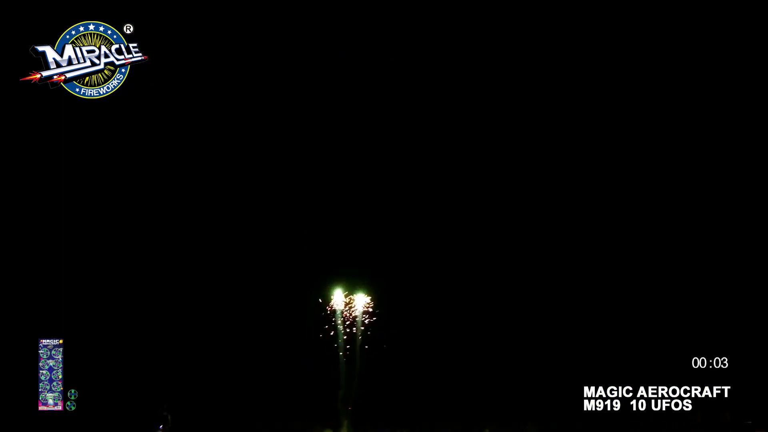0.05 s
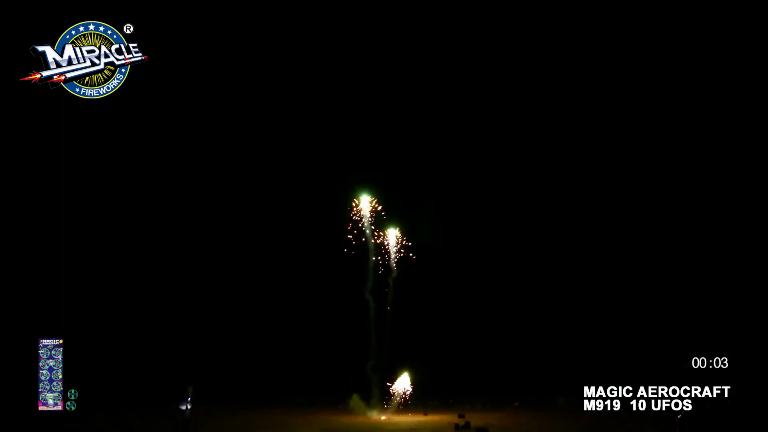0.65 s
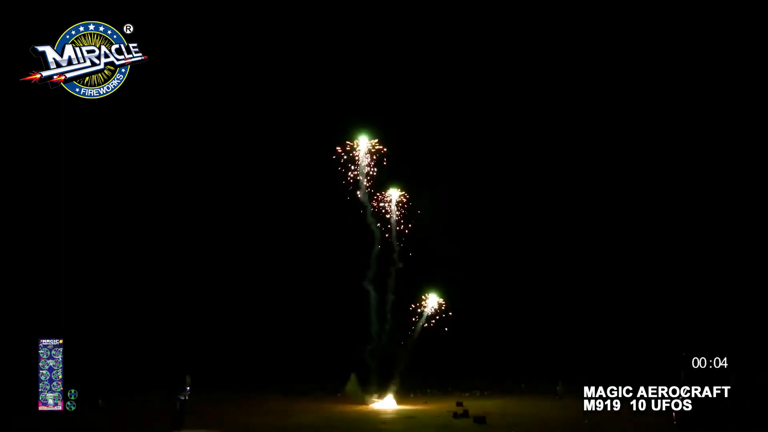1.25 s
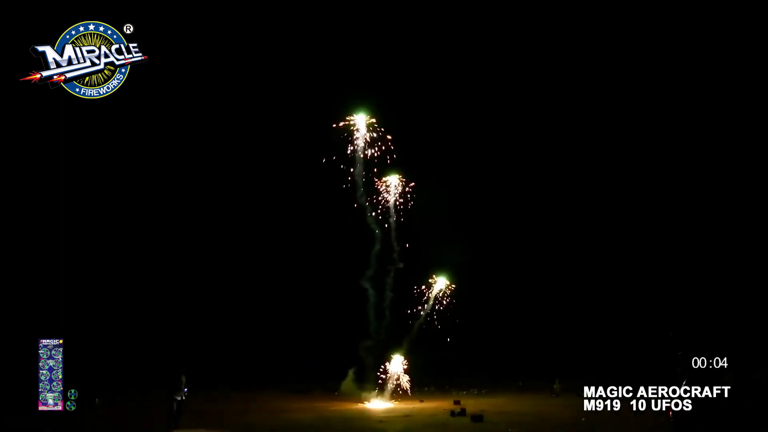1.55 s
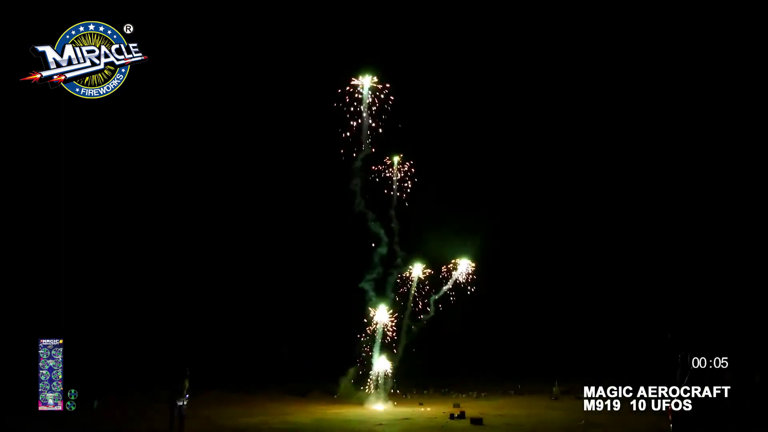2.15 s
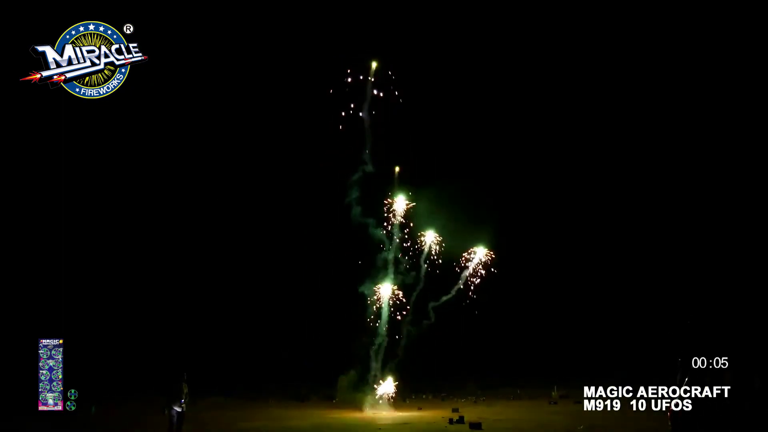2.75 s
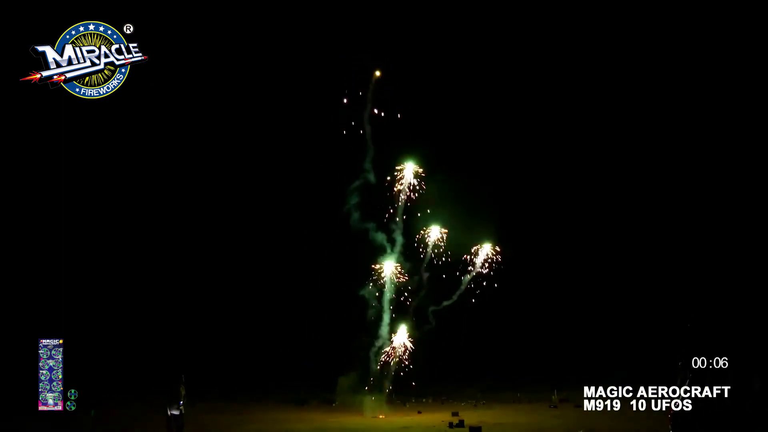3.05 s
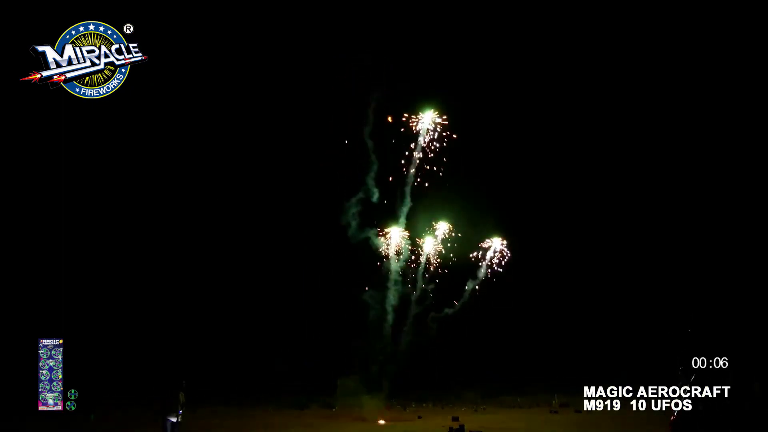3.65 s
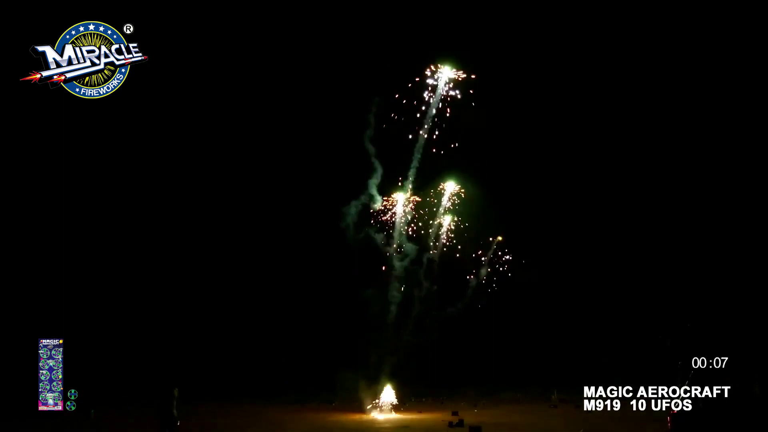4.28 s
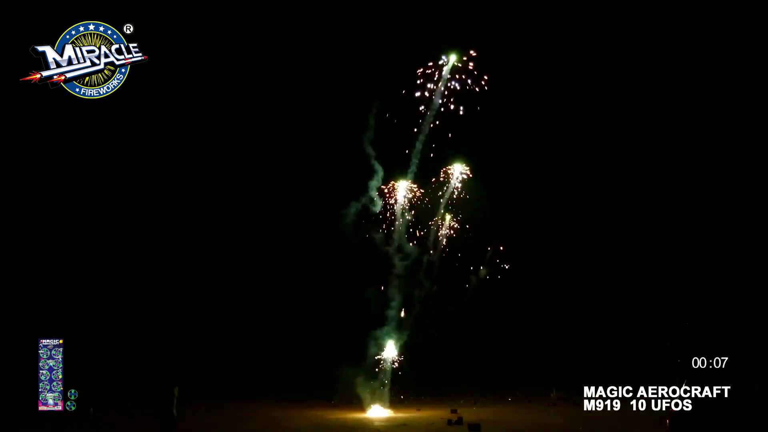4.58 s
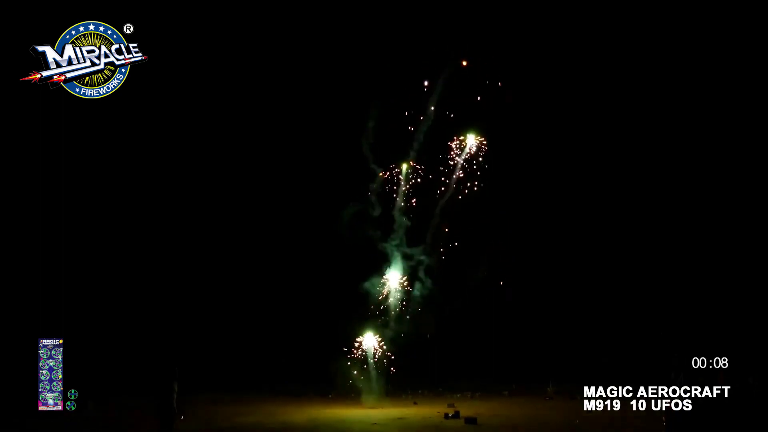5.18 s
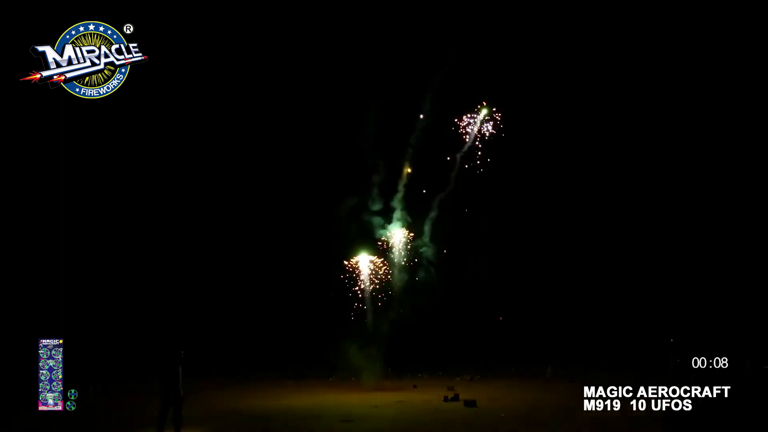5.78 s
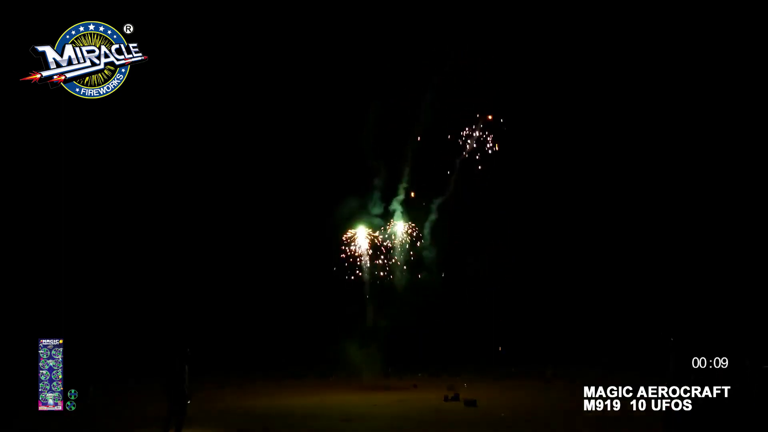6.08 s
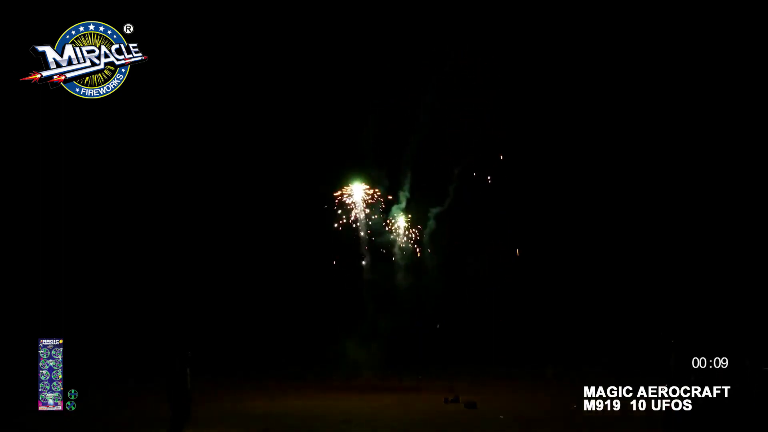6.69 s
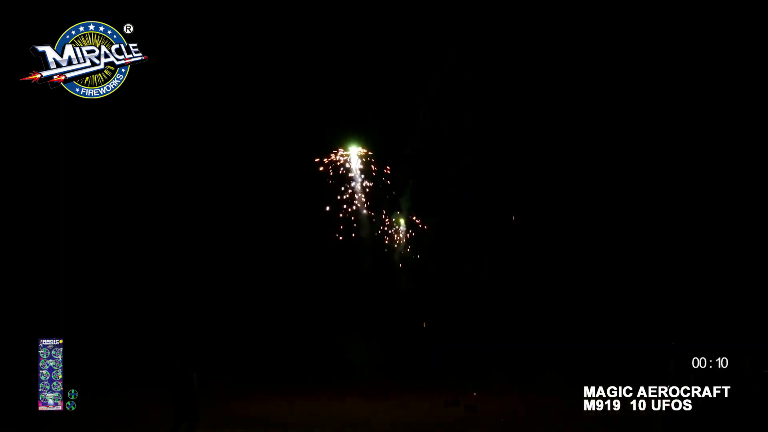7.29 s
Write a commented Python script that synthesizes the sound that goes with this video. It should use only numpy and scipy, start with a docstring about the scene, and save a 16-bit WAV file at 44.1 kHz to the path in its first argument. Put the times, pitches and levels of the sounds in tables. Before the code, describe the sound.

Small spinning fireworks rise one after another with a dense, continuous fizzing hiss, spraying sparks and sputtering outdoors.

```python
"""Spinner fireworks in a night field

Open ground, a stereo microphone facing nine small spinners that light one after another, two of them
already burning. Each gas jet roars low down, then whirls upward at up to about a hundred turns a
second, hissing, sputtering and spraying sparks. Its echo off the ground lags more as it climbs,
so the hiss sweeps downward like a flanger. A faint rumble lies far behind."""
import sys
import numpy as np
from scipy import signal
from scipy.fft import rfft, irfft
from scipy.io import wavfile
from scipy.ndimage import uniform_filter1d, map_coordinates

SR = 44100
rng = np.random.default_rng(int(sys.argv[2]) if len(sys.argv) > 2 else 0)


def transcribe(signal):
    """Save signal, clipped to [-1, 1], as a 16-bit WAV file at the path in sys.argv[1]."""
    frames = np.atleast_2d(signal).T
    limited = np.clip(frames, -1, 1)
    pcm = np.round(limited * 32767).astype(np.int16)
    wavfile.write(sys.argv[1], SR, pcm)


N = 323253
TIME = np.arange(N) / SR
BINS = np.fft.rfftfreq(N, 1 / SR)

# The spinners. Each row: ignition in seconds, burn time in seconds, jet against the others in dB,
# top spin in Hz, roar in dB, roar length in seconds, spark flare and spark trail against the hiss in dB.
SPINNERS = [(-0.88, 3.47, 3.5, 97, -37, 0.5, -5, -4.5), (-1.18, 3.3, 1, 66, -37, 0.5, -2, -6.5),
            (0.25, 4.13, 0.5, 84, -34, 0.55, 1, -6.5), (1.15, 3.67, 2, 80, -31.5, 0.43, 2, -6.5),
            (1.5, 2.7, 3, 96, -32, 0.43, 0.5, -7.5), (1.7, 3.7, 0.5, 114, -37, 0.4, -1, -8),
            (2.5, 3.12, 3, 106, -32.5, 0.43, -0.5, -6), (4, 3.7, 1, 86, -30.5, 0.28, 1.3, -5.5),
            (4.38, 3.8, 5, 99, -33, 0.44, 0.5, -4)]
# Overall loudness of the hiss and sparks, dipping briefly around loud sputters.
# Each row: time in seconds, level in dB.
HISS_LEVEL = [(0.0, -22.5), (0.3, -24), (1.34, -24), (1.38, -24.5), (1.48, -26), (1.61, -23.5),
              (1.63, -25.5), (2.68, -23.5), (2.81, -26), (3.66, -23.5), (4.31, -25), (4.37, -26),
              (4.43, -25.5), (5.37, -23.5), (5.9, -26), (7.3, -25)]


def flights():
    """For each spinner: its share of the jet sound, its angle of turn and its echo lag in samples."""
    # The climbs, as lag of the ground echo. Each row: wait on the ground in seconds, run-up in seconds,
    # lag gained by the leap in ms, later drift in ms per second.
    climbs = [(.19, .4, 2.66, .75), (.2, .47, 2.57, .295), (.31, .45, 2.51, -.07), (.35, .2, 1.2, .71),
              (.27, .48, 4.3, .36), (.19, .41, 1.89, .4), (.24, .39, 3.19, .315), (.26, .52, 3.24, -.24),
              (.3, .36, 1.17, .98)]
    # A spinner's life. Each row: age in seconds, relative jet level in dB, spin as a share of its top.
    life = [(0, -7, .3), (.35, -5.5, .7), (.6, -2, .92), (.88, 1.5, 1), (1.25, -2.5, .94), (1.65, -4, .85),
            (2.25, -2.5, .77), (3.7, -6, .7)]
    shares, angles, lags = [], [], []
    for (lit, burn_s, jet_db, top_hz, *_), climb in zip(SPINNERS, climbs):
        age = TIME - lit
        shares.append(alight(lit, burn_s) * gain_of(jet_db + curve(life, age, column=1)))
        turns = np.cumsum(top_hz * curve(life, age, column=2)) / SR
        angles.append(2 * np.pi * (turns + rng.random()))
        lags.append(echo_lag(age, *climb) * SR)
    together = np.sqrt(np.sum(np.square(shares), 0) + 1e-6)
    return shares / together, angles, lags


def alight(lit, burn_s, catch_s=0.027, die_s=0.31):
    """1 while a spinner burns: it catches at once and gutters out slowly."""
    return np.clip((TIME - lit) / catch_s, 0, 1) * np.clip((lit + burn_s - TIME) / die_s, 0, 1)


def echo_lag(age, wait_s, run_up_s, leap_ms, drift_ms_per_s):
    """A spinner waits, leaps along an S-curve, then drifts; its echo lag in seconds grows with height."""
    flown = np.maximum(age - wait_s, 0)
    leap = 1 - (1 + flown / run_up_s) * np.exp(-flown / run_up_s)
    return leap * (leap_ms + drift_ms_per_s * flown) / 1000


def jets(flight, throb, grainy, ground_echo=0.5, shimmer_samples=0.4):
    """Each nozzle throbs once and twice a turn, reaching the microphone directly and off the ground."""
    total = np.zeros(N)
    shimmer = shimmer_samples * wander(9.7)  # moving air bends the echo's path a little
    for share, angle, lag in zip(*flight):
        gas = rng.standard_normal(N) + grainy * crackle(per_s=1800, spread_db=3)
        jet = share * gas * (1 + throb * (np.cos(angle) + 0.79 * np.cos(2 * angle)))
        on = np.flatnonzero(share)
        echo = map_coordinates(jet, [on - lag[on] - shimmer[on]], order=3)
        # on the ground the two paths add in phase; that extra power is divided out
        in_phase = 1 + 2 * ground_echo / (1 + ground_echo ** 2) * np.exp(-lag[on] / 3)
        total[on] += (jet[on] + ground_echo * echo) / np.sqrt(in_phase)
    return unit_rms(total)


def hiss(flight, flutter, level_db=0.48, throat_db=-1.1, waver_db=0.41, lift_off_db=0.54, split_hz=2800):
    """Gas rushes from all the nozzles; its throaty lower half flutters during the roar of lift-off."""
    # The rushing gas. Each row: frequency in Hz, relative level in dB.
    spectrum = [(60, -41), (250, -17), (500, -12), (800, -10), (1150, -6), (1600, -2), (2050, -1),
                (2400, -1.5), (3600, -1.5), (5100, -2), (5900, -6.5), (6700, -7.5), (9000, -7.5),
                (15500, -27.5)]
    # The course of the throaty half. Each row: time in seconds, level in dB.
    throat_levels = [(0.0, -26), (0.65, -25), (0.75, -28), (0.81, -25.5), (0.91, -28), (1.46, -22.5),
                     (1.48, -26), (2.27, -26.5), (2.82, -23.5), (2.86, -25.5), (4.39, -24.5), (4.47, -27),
                     (4.53, -25), (5.0, -27), (5.1, -25), (5.63, -24.5), (5.71, -26), (7.3, -27.5)]
    rush = rfft(coloured(jets(flight, throb=0.13, grainy=0.27), spectrum))
    low_pass = 1 / (1 + (BINS / split_hz) ** 6)
    flutter_db = lift_off_db * unit_rms(lift_off()) * flutter
    throat_gain = gain_of(throat_db + curve(throat_levels, TIME) + flutter_db)
    throat = unit_rms(irfft(rush * low_pass, N)) * throat_gain
    bright = unit_rms(irfft(rush * (1 - low_pass), N)) * gain_of(curve(HISS_LEVEL, TIME))
    return (throat + bright) * gain_of(level_db + waver_db * wander(12.0))


def sparks(flight, level_db=-0.97, flutter_db=0.76):
    """Burning metal grains add a bright, gritty spray, the more uneven the thicker it is."""
    # The fizz of the grains. Each row: frequency in Hz, relative level in dB.
    spectrum = [(2000, -85), (5000, -7), (7000, -8), (8200, -4), (9600, -2.5), (10400, -5.5), (12000, -7),
                (13500, -10), (15000, -16.5), (16000, -36)]
    # Spurts of sparks. Each row: peak time in seconds, level in dB, length in seconds.
    spurts = [(0.339, -22, 0.039), (0.489, -19, 0.027), (0.523, -21, 0.011), (1.697, -24, 0.025),
              (1.748, -26, 0.02), (1.86, -23, 0.025), (2.133, -20, 0.014), (2.82, -29, 0.02),
              (2.864, -22, 0.012), (4.146, -22.5, 0.024), (4.205, -25, 0.014), (4.261, -19.5, 0.02),
              (4.671, -22, 0.025), (4.71, -22, 0.014), (5.7, -28, 0.04), (6.3, -29, 0.06)]
    spray = unit_rms(coloured(jets(flight, throb=0.24, grainy=0.45), spectrum))
    thickness = spark_shower()
    shower = thickness * gain_of(level_db + flutter_db * unit_rms(thickness) * wander(40))
    return spray * np.hypot(shower, puffs(spurts, column=1))


def spark_shower(build_up=1.24, flare_at_s=0.57, fall_s=0.3):
    """Thickness of the spray: each spinner flares as it gathers speed, then thins to a steady trail."""
    power = np.zeros(N) + 1e-12
    for lit, burn_s, *_, flare_db, trail_db in SPINNERS:
        age = TIME - lit
        grown = np.clip(age / flare_at_s, 0, 1) ** build_up
        flare = gain_of(flare_db) * np.exp(-np.maximum(age - flare_at_s, 0) / fall_s)
        power += (alight(lit, burn_s) * grown * np.hypot(flare, gain_of(trail_db))) ** 2
    return np.sqrt(power) * gain_of(curve(HISS_LEVEL, TIME))


def turbulence(x, patchy_db=1.0):
    """Hot, swirling air lets single pitches swell and fade for a moment."""
    spectra = signal.stft(x, nperseg=1024, noverlap=768)[2]
    patches = uniform_filter1d(rng.standard_normal(spectra.shape), size=6, axis=0)  # across pitch
    patches = uniform_filter1d(patches, size=12, axis=1)  # across time
    gain = unit_rms(gain_of(patchy_db * unit_rms(patches)))
    return signal.istft(spectra * gain, nperseg=1024, noverlap=768)[1][:N]


def roar(flutter, level_db=3.0, flutter_db=2.0):
    """Uneven burning, strongest as a spinner lights and lifts off."""
    # The low roar of the flame. Each row: frequency in Hz, relative level in dB.
    spectrum = [(25, -58), (65, -49), (110, -20), (150, -4.5), (225, -1), (285, -8), (400, 2), (480, 3.5),
                (600, -6), (760, 4), (1100, -6.5), (2000, -3), (3500, -7.5), (8000, -14.5)]
    gas = rng.standard_normal(N) + 0.91 * crackle(per_s=400, spread_db=1.0)
    return unit_rms(coloured(gas, spectrum)) * lift_off() * gain_of(level_db + flutter_db * flutter)


def lift_off(rise_s=0.18, fall_s=0.16, aloft_db=-49.5):
    """Strength of the roar: each spinner swells, holds near the ground and fades to a murmur aloft."""
    power = np.zeros(N) + 1e-12
    for lit, burn_s, _, _, roar_db, roar_s, *_ in SPINNERS:
        age = TIME - lit
        swell = np.clip(age / rise_s, 0, 1) * np.exp(-np.maximum(age - roar_s, 0) / fall_s)
        power += (alight(lit, burn_s) * np.hypot(gain_of(roar_db) * swell, gain_of(aloft_db))) ** 2
    return np.sqrt(power)


def sputters(knock_db=-3.5, spit_db=-1):
    """A nozzle clogs and clears: a dull knock and a rough spit."""
    # The clogs. Each row: peak time in seconds, relative knock and spit levels in dB, length in seconds.
    clogs = [(0.421, -27, -32, 0.0097), (0.81, -45, -25, 0.018), (1.359, -29, -18, 0.013),
             (1.405, -25.5, -19, 0.016), (1.44, -39, -24, 0.014), (1.463, -37, -26, 0.01),
             (1.493, -43, -22, 0.0106), (1.536, -34, -20, 0.005), (1.558, -24, -21, 0.0061),
             (1.626, -35, -22, 0.006), (1.734, -25, -37, 0.011), (1.748, -25, -34, 0.008),
             (1.78, -38, -19, 0.0057), (2.157, -23.5, -32, 0.0076), (2.688, -31, -20, 0.014),
             (2.737, -27, -19, 0.008), (2.769, -23, -18, 0.0066), (2.82, -36, -25, 0.018),
             (3.018, -23.5, -33, 0.0092), (4.228, -35, -22, 0.025), (4.337, -34, -20.5, 0.0078),
             (4.545, -44, -20.8, 0.024), (4.586, -32, -22.5, 0.029), (4.807, -48, -23, 0.017),
             (5.564, -37, -23, 0.014), (5.883, -34, -23, 0.013), (6.914, -47, -25, 0.0098)]
    # The tone of the knock and of the spit. Each row: frequency in Hz, relative level in dB.
    knock_spectrum = [(40, -46), (85, -27), (150, -2.5), (280, -3), (420, 4.5), (700, 0.5), (1500, -16),
                      (5000, -38)]
    spit_spectrum = [(200, -37), (600, -3), (1100, 9), (2000, 11), (3000, 7), (5000, 0), (9000, -20),
                     (15000, -35)]
    knocks = bursts(clogs, knock_spectrum, snap=0.59, column=1)
    spits = bursts(clogs, spit_spectrum, snap=0.29, column=2)
    return gain_of(knock_db) * knocks + gain_of(spit_db) * spits


def bursts(rows, spectrum, snap, column):
    """Each burst is one sharp pressure pulse inside a short puff of crackling gas."""
    pulses = np.zeros(N)
    for row in rows:
        pulse_s = row[0] - row[-1] / 4  # just ahead of the puff's peak
        pulses[int(pulse_s * SR)] += gain_of(row[column]) * np.sqrt(.008 * SR)
    gas = coloured(crackle(per_s=2700, spread_db=2.0), spectrum)
    return puffs(rows, column) * unit_rms(gas) + snap * coloured(pulses, spectrum) / gas.std()


def hum(flight, level_db=-53, steepness=7, full_hz=100, waver_db=0.0):
    """The spinning body hums at its rate of turn, growing steeply louder up to full_hz."""
    total = np.zeros(N)
    for share, angle in zip(*flight[:2]):
        spin_hz = np.gradient(angle) * SR / (2 * np.pi)
        total += share * np.sin(angle) * np.minimum(spin_hz / full_hz, 1) ** steepness
    return total * gain_of(level_db + waver_db * wander(10))


def field_scatter(mid):
    """The side signal: the field scatters each pitch along a path of its own length."""
    # Stereo width. Each row: frequency in Hz, side against mid in dB.
    width = [(60, -37), (180, -38), (350, -32), (700, -26), (1400, -26), (2800, -22), (5000, -23),
             (8000, -29), (11000, -18), (15000, -13)]
    late_s = np.interp(BINS, np.linspace(0, SR / 2, 400), rng.uniform(.003, .025, 400))
    delay = np.exp(-2j * np.pi * np.cumsum(late_s) * SR / N)
    return coloured(irfft(rfft(mid) * delay, N), width)


def night(level_db=-64):
    """A faint, far rumble under everything."""
    # The distant rumble. Each row: frequency in Hz, relative level in dB.
    spectrum = [(25, -26), (65, -20), (100, -9.5), (135, 3), (250, -24), (1000, -37)]
    return gain_of(level_db) * unit_rms(coloured(rng.standard_normal(N), spectrum))


def gain_of(db):
    """Decibels to a factor."""
    return 10 ** (np.asarray(db) / 20)


def unit_rms(x):
    """Scales to rms 1."""
    return x / np.sqrt(np.mean(x ** 2) + 1e-20)


def curve(rows, at, column=1):
    """One column of a table, joined by straight lines."""
    rows = np.asarray(rows, float)
    return np.interp(at, rows[:, 0], rows[:, column])


def coloured(x, spectrum):
    """Filters by a (Hz, dB) spectrum on a log-frequency axis."""
    hz, db = np.transpose(spectrum)
    return irfft(rfft(x) * gain_of(np.interp(np.log(BINS + 1), np.log(hz), db)), N)


def wander(rate_hz):
    """A slow random drift of rms 1, fading out above the rate."""
    return unit_rms(irfft(rfft(rng.standard_normal(N)) / (1 + (BINS / rate_hz) ** 2), N))


def crackle(per_s, spread_db):
    """Random clicks, most small and a few large."""
    size = gain_of(spread_db * np.minimum(rng.exponential(1, N), 5))
    return unit_rms(size * rng.choice([-1, 1], N) * (rng.random(N) < per_s / SR))


def puffs(rows, column):
    """A bell-shaped swell for each row, as high as the dB in the chosen column."""
    total = np.zeros(N)
    for row in rows:
        peak_s, length_s = row[0], row[-1]
        near = slice(max(int((peak_s - 2 * length_s) * SR), 0), int((peak_s + 2 * length_s) * SR))
        total[near] += gain_of(row[column]) * np.exp(-2 * ((TIME[near] - peak_s) / length_s) ** 2)
    return total


def scene():
    """The spinners are straight ahead of the microphone; faint scatter gives a little width."""
    flight, flutter = flights(), wander(55)
    aloft = turbulence(hiss(flight, flutter) + sparks(flight)) + hum(flight)
    mid = aloft + roar(flutter) + sputters() + night()
    side = field_scatter(mid)
    return np.array([mid + side, mid - side])


def record(dry):
    """The recorder's band limit cuts the highest treble."""
    edge_hz = 15750
    low_pass = signal.firwin(511, edge_hz, window=("kaiser", 9), fs=SR)
    return signal.oaconvolve(dry, low_pass[None], "same")


dry = scene()
out = record(dry)
transcribe(out)
```